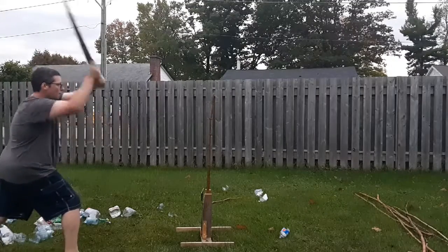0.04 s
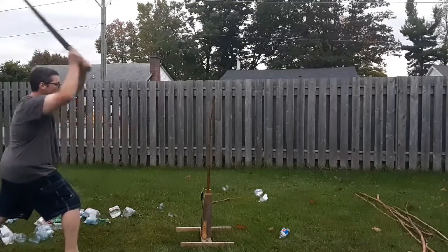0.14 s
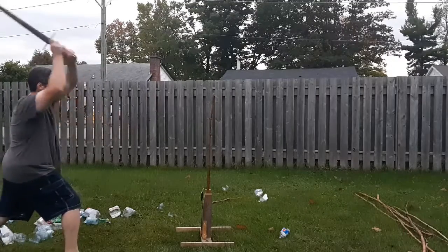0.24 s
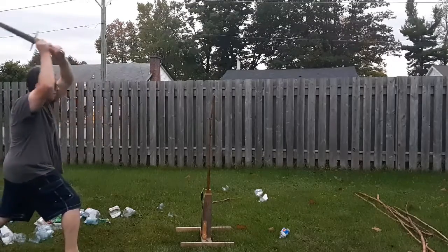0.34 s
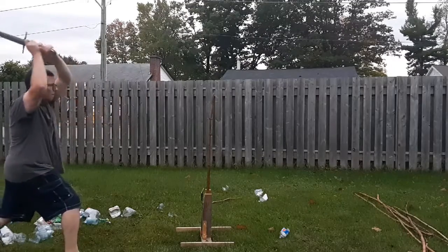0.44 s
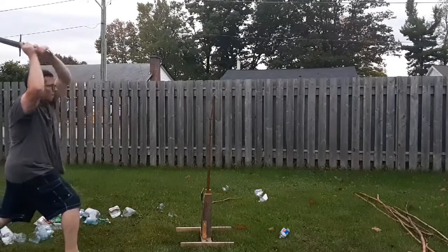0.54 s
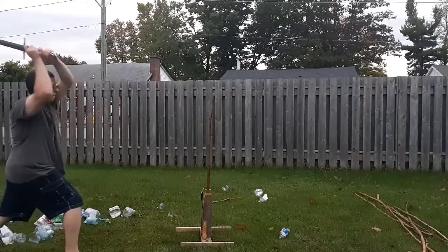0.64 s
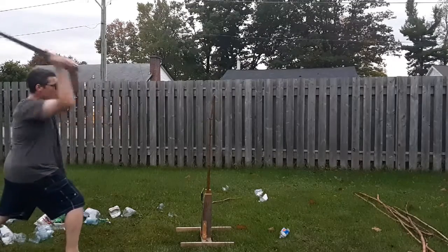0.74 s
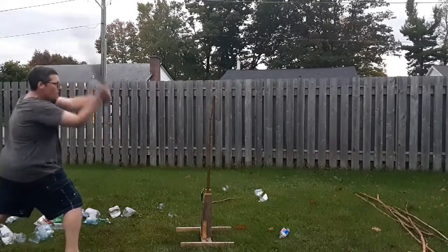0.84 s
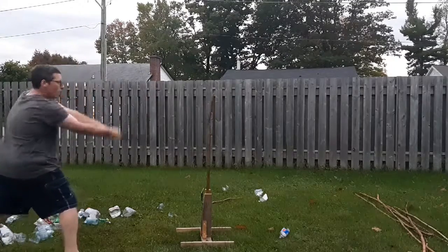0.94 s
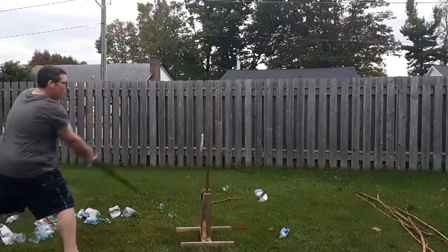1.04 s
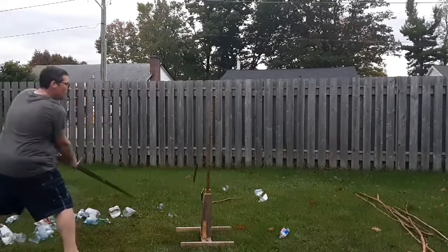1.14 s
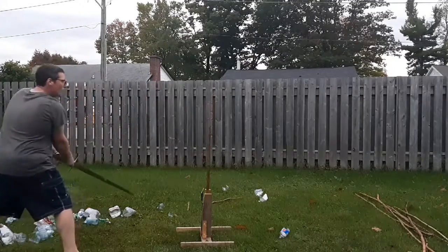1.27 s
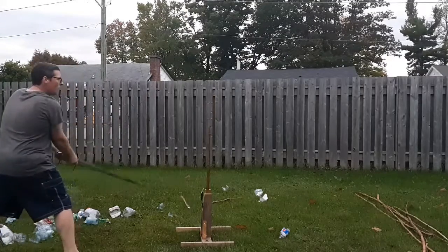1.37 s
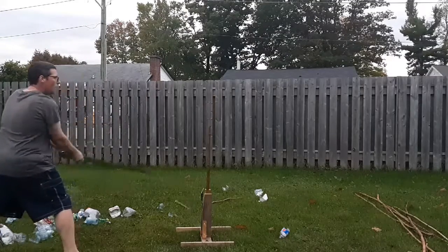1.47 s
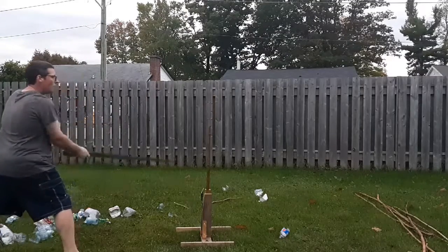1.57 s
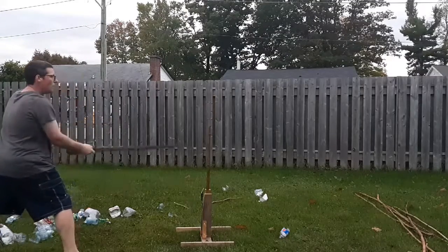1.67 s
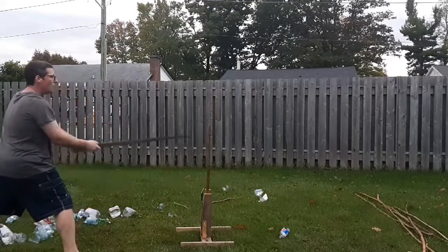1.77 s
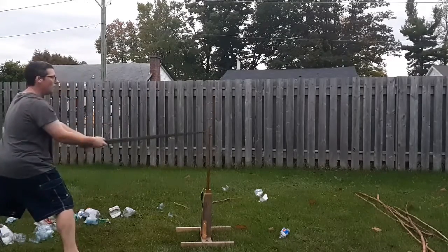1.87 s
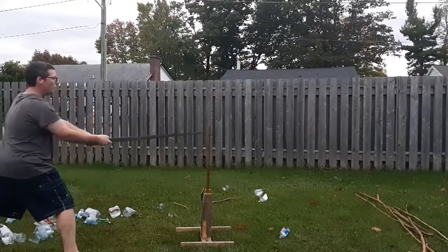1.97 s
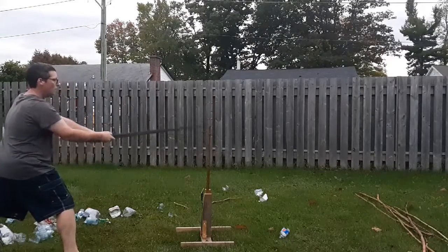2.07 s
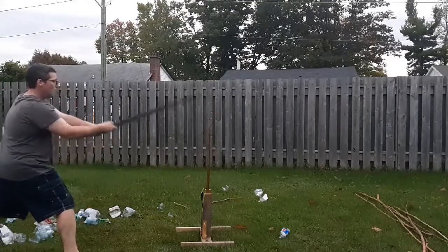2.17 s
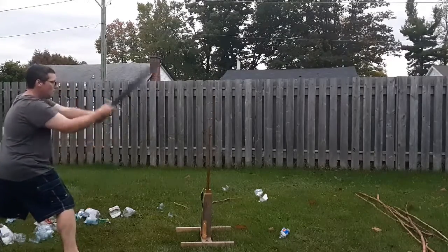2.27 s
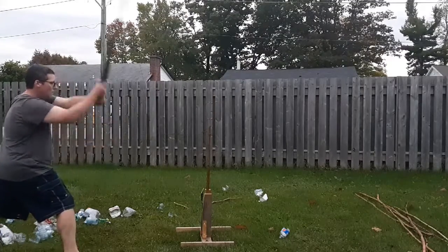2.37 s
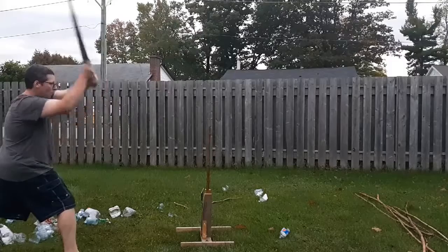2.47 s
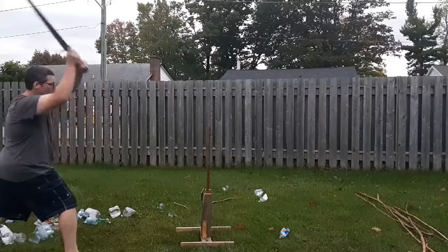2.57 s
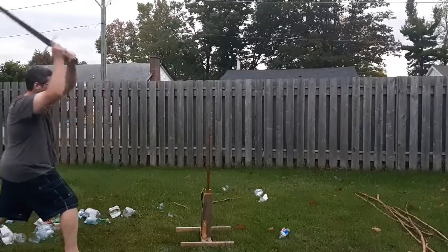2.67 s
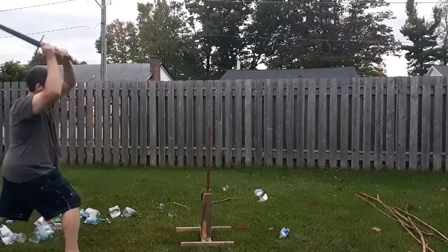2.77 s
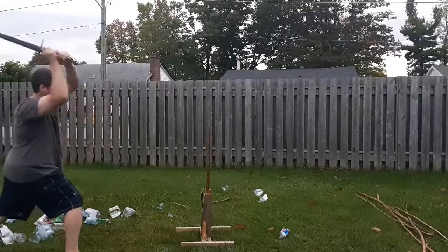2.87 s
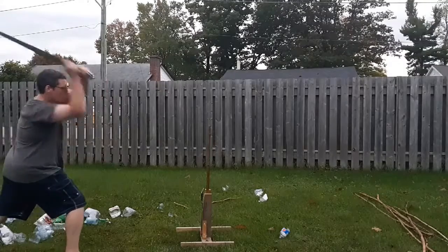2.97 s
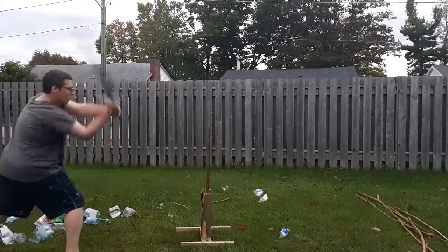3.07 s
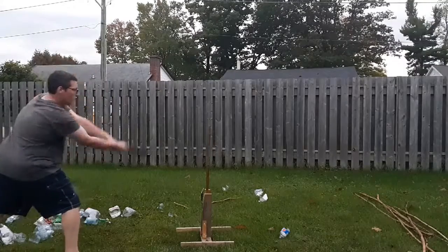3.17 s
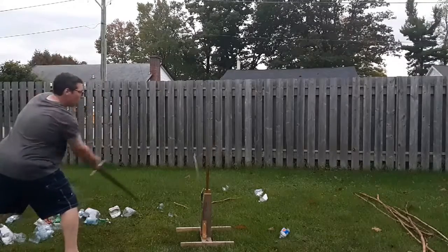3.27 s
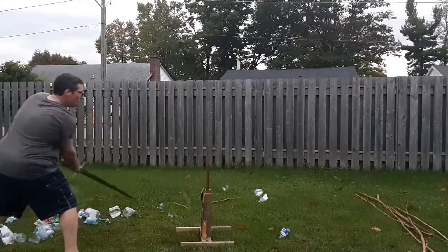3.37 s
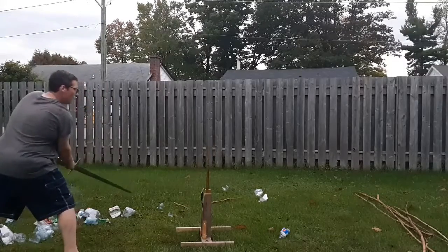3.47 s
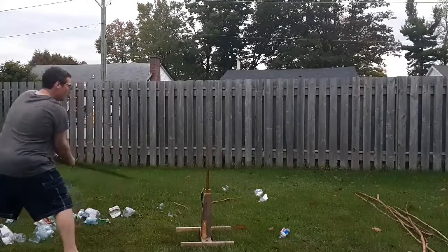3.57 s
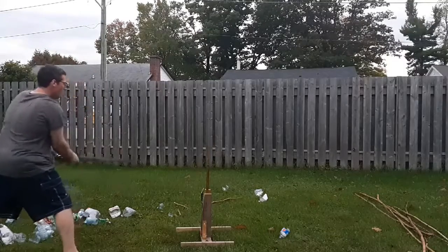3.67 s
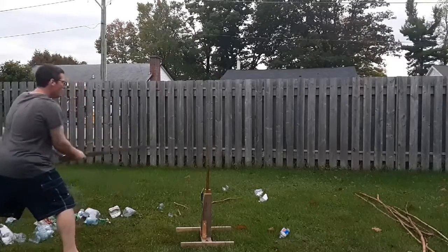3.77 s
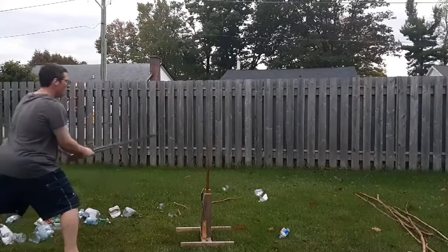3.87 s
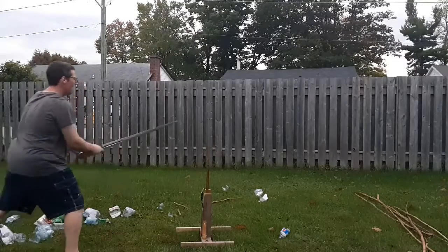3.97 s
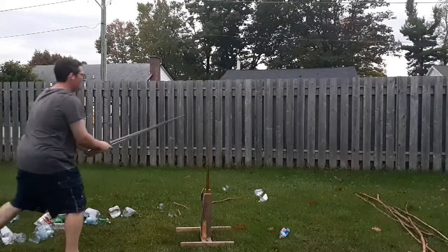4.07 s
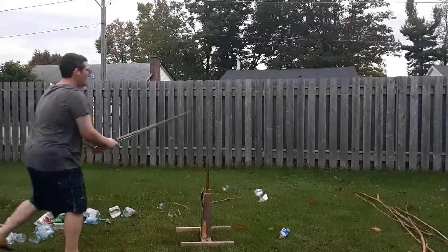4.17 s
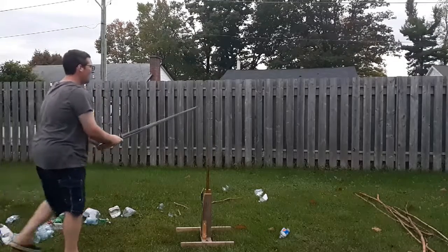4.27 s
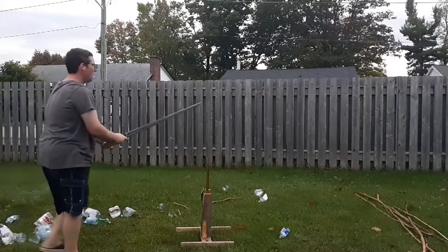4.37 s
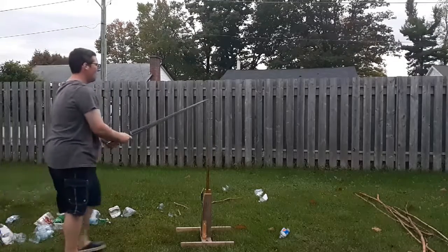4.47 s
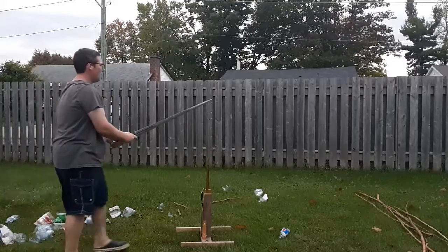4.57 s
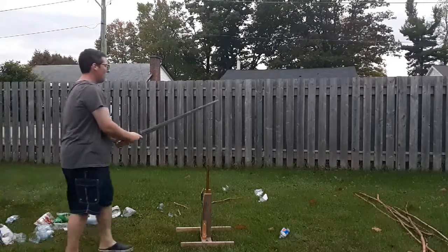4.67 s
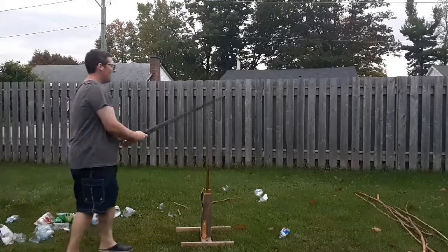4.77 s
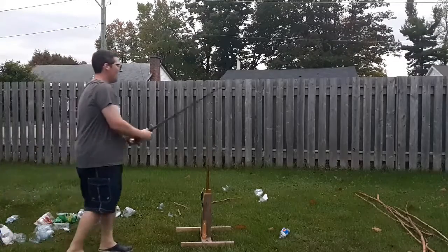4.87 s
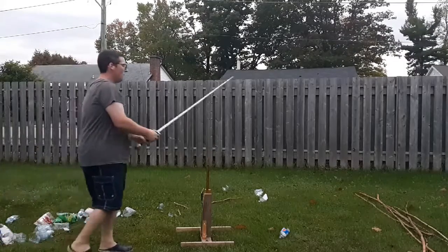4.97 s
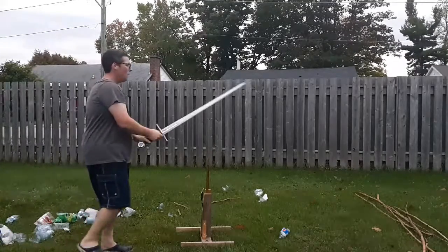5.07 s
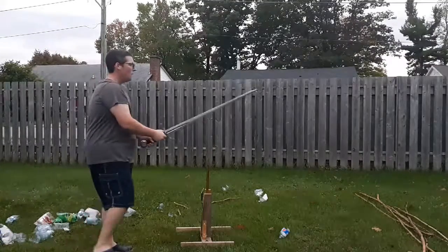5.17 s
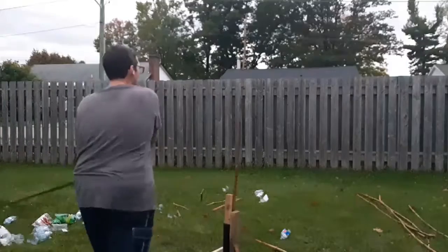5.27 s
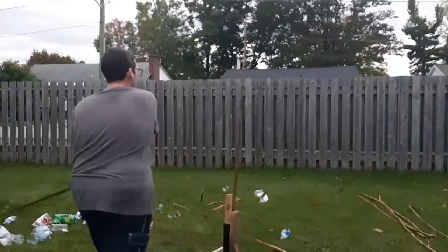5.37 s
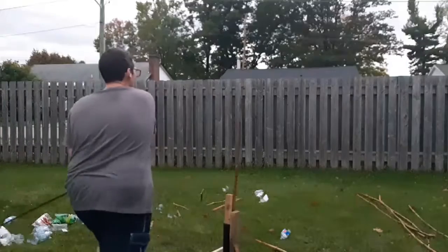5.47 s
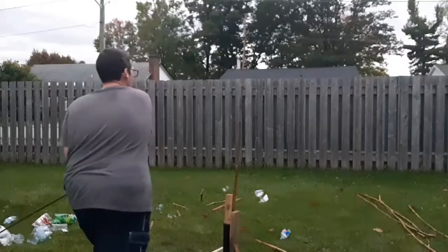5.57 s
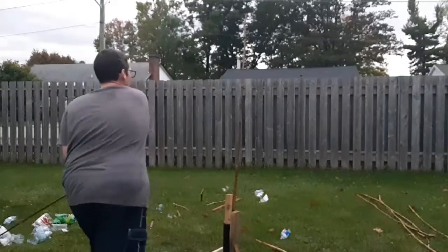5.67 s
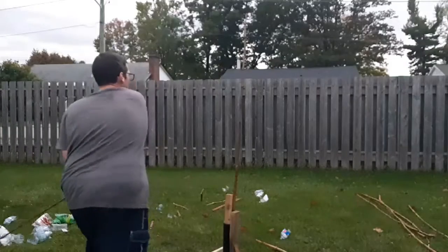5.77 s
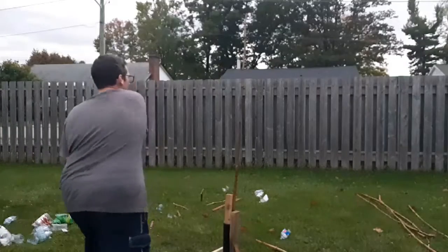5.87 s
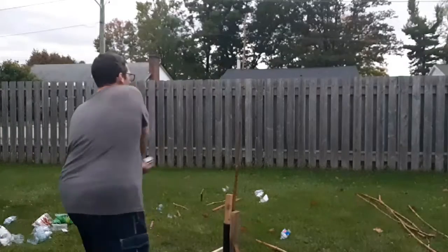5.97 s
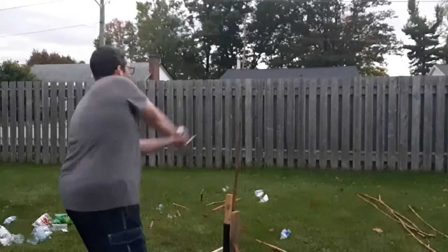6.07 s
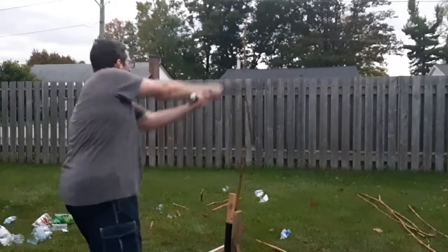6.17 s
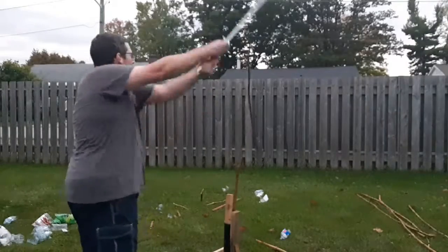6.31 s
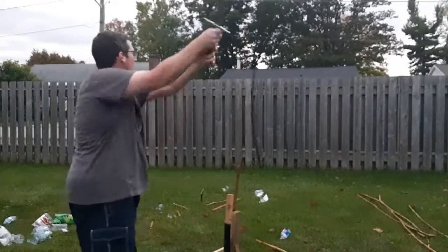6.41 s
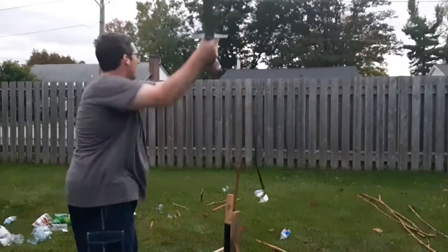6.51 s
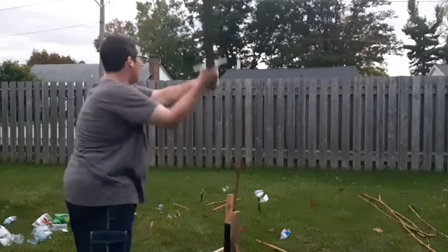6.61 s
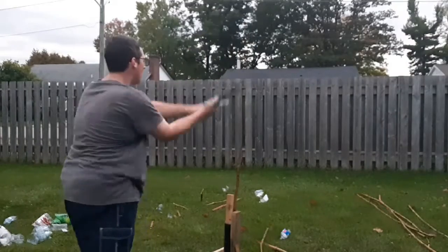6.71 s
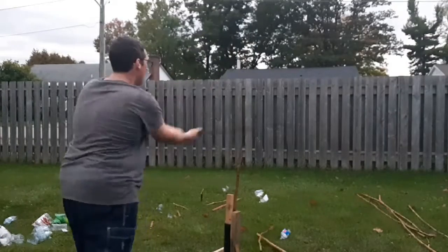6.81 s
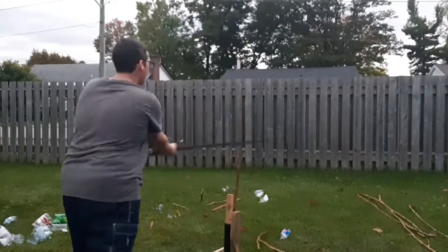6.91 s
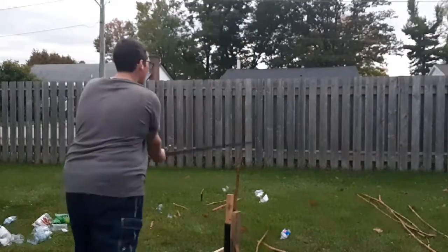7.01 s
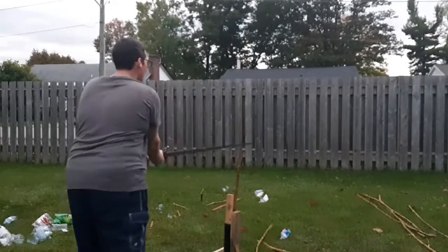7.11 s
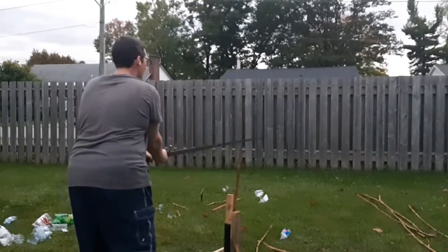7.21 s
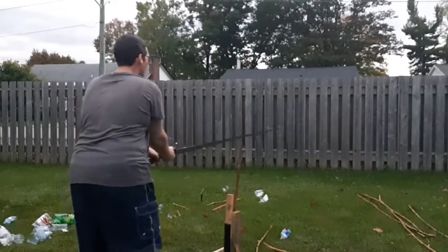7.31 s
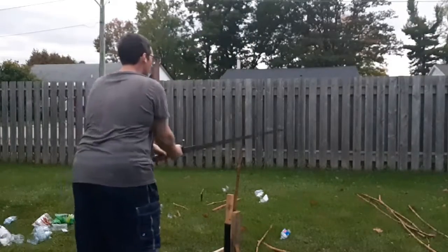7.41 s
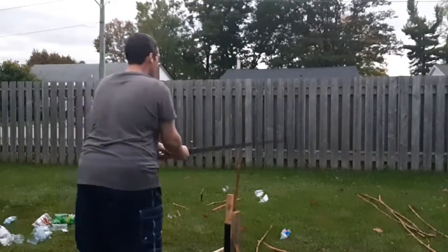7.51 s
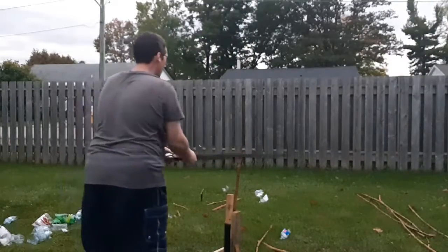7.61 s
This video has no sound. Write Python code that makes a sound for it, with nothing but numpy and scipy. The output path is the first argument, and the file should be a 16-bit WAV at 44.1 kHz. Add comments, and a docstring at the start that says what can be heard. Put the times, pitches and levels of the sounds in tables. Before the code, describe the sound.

Outdoors, a sword cracks through hollow bamboo three times, each snap echoing off fence and house, followed by light woody clicks over soft suburban rumble.

```python
"""In a fenced back yard in a suburb, a sword cuts an upright bamboo stalk three times.
Each cut is a burst of snapping fibres and a ringing tube, answered by fence, house and yard.
Blade swishes are narrow moving noise; knocks are short rattles that ring bamboo; grass rustles in crisp swells.
Behind them are a faint falling whistle, a far engine made of two low tones, and the filtered noise of the suburb.
The recorder turns itself down for about a second after each cut."""
import sys
import numpy as np
from scipy import signal
from scipy.fft import rfft, irfft
from scipy.io import wavfile
from scipy.ndimage import uniform_filter1d, minimum_filter1d

SR = 44100
rng = np.random.default_rng(int(sys.argv[2]) if len(sys.argv) > 2 else 0)


def dump(signal):
    """Clip the signal to [-1, 1] and save it as 16-bit WAV at the path in sys.argv[1]."""
    limited = np.clip(np.atleast_2d(signal).T, -1, 1)
    pcm = np.round(limited * 32767).astype(np.int16)
    wavfile.write(sys.argv[1], SR, pcm)


N = 337365
TIME = np.arange(N) / SR


def undb(db):
    """Turn decibels into a gain."""
    return 10 ** (np.asarray(db) / 20)


def unit(x):
    """Scale a sound to an average strength (rms) of 1."""
    return x / np.sqrt(np.mean(x ** 2))


def curves(rows):
    """Join each column of a timed table by straight lines."""
    s, *columns = np.transpose(rows)
    return [np.interp(TIME, s, column) for column in columns]


def add(out, s, x):
    """Mix x into out from time s."""
    start = int(s * SR)
    out[start:start + len(x)] += x[:N - start]


def colour(x, points, size=4096):
    """Filter through (f/Hz, level/dB) points without looking ahead, keeping the power of white noise."""
    hz, db = np.transpose(points)
    bin_hz = np.arange(size // 2 + 1) * SR / size
    gain = undb(np.interp(np.log(bin_hz + 1), np.log(hz), db))
    # folding the cepstrum makes the filter respond as early as it can
    cepstrum = irfft(np.log(gain))
    cepstrum[1:size // 2] *= 2
    cepstrum[size // 2 + 1:] = 0
    response = irfft(np.exp(rfft(cepstrum)))
    return signal.fftconvolve(x, response / np.linalg.norm(response))[:len(x)]


def walk(rate):
    """Smooth random drift of rms 1, heading for a new value `rate` times a second."""
    k = int(SR / rate)
    steps = np.repeat(rng.standard_normal(N // k + 1), k)
    smooth = uniform_filter1d(uniform_filter1d(steps, k), k)
    return unit(smooth[:N])


def swell(s, width_s):
    """A smooth bell-shaped rise and fall that reaches 1 at time s."""
    return np.exp(-.5 * ((TIME - s) / width_s) ** 2)


def rush(hz, half_width_hz):
    """Narrow noise around a moving pitch: two slow random signals ride on a cosine and a sine."""
    lowpass = signal.butter(2, half_width_hz, fs=SR, output="sos")
    eddies = signal.sosfilt(lowpass, rng.standard_normal((2, N)))
    phase = 2 * np.pi * np.cumsum(hz) / SR
    return unit(eddies[0] * np.cos(phase) + eddies[1] * np.sin(phase))


def ring(modes, t, ratio=1):
    """Hollow bamboo vibrates at several pitches at once, each dying away from t = 0."""
    t = np.maximum(t, 0)
    total = 0
    for hz, db, t60 in modes:
        decay = np.exp(-np.log(1000) * t / t60)
        total = total + undb(db) * np.sin(2 * np.pi * hz * ratio * t) * decay
    return total


def fibres(t, length, fade_s, scatter_db):
    """Dense snaps of uneven size while the contact lasts, dying out after it."""
    size_db = scatter_db * np.clip(rng.standard_normal(len(t)), -2, 2)
    snaps = rng.choice([-1, 1], len(t)) * undb(size_db)
    return unit(snaps) * np.exp(-np.maximum(t - length, 0) / fade_s)


def cuts(tick_db=-8.5, tube_db=-4.0):
    """The blade crushes through the fibres, a few snap loudly, the tube rings and the yard answers."""
    # one row per cut: t/s, crushing level/dB, time in the stalk/s, pulse into the yard/dB,
    # fence echo delay/s, fence echo/dB, house echo/dB
    cut_rows = [(1.0722, -18, 0.0058, 3.5, 0.026, -8.5, -16), (3.3125, -18, 0.005, 4, 0.025, -6, -18.5),
                (6.2808, -15.5, 0.00626, 4.5, .028, -9.5, -26)]
    # colour of the splitting fibres, one list per cut: f/Hz, level/dB
    split_colours = [
        [(100, -34), (250, -5), (400, -4.5), (720, -2), (1000, 3), (1300, 2), (1750, 8.5), (2500, -10),
         (3800, -0.5), (4800, -6), (6200, 1), (7800, -9.5), (10500, -17.5), (14500, -14.5)],
        [(100, -12), (200, -4.5), (450, -5.5), (720, -1.5), (970, 0), (1350, 7), (2200, 8.5), (2850, -8),
         (3400, 7.5), (4300, -4), (6000, 1), (8500, -7), (11000, -16), (15000, -12)],
        [(100, -29), (400, -13), (650, 0.5), (880, -13), (1080, 5.5), (1750, 1.5), (2700, -0.5), (3500, -1.5),
         (4500, 10.5), (5300, -3.5), (6400, -1.5), (8200, -14.5), (15000, -22)],
    ]
    # ring of the tube, one list per cut as it gets shorter: f/Hz, level before tube_db/dB, t60/s
    tube_modes = [
        [(1022, -16, 0.091), (1195, -28, 0.18), (1525, -21, .055), (1737, -19.5, 0.029), (3170, -22.5, .022),
         (6160, -19.5, 0.025)],
        [(832, -20, 0.089), (1390, -28, 0.058), (2150, -30.5, 0.02), (2280, -19, 0.04), (3340, -24, 0.022),
         (4620, -18, 0.04)],
        [(1020, -31, 0.037), (1200, -29, 0.12), (1698, -15, .04), (2120, -22, 0.047), (4330, -29, .07),
         (4600, -30, .035)],
    ]
    # colour of each cut as it spreads to all sides, one list per cut: f/Hz, level/dB
    spread_colours = [
        [(210, -48.5), (350, -18), (481, -16), (774, -18), (981, 1.5), (1080, -6), (1480, -4.5), (1660, -8),
         (1790, -3), (2310, -12.5), (4570, -9), (6690, -12.5), (8620, -20.5), (15500, -18.5)],
        [(210, -36), (350, -22.5), (563, -21), (610, -11), (761, -24), (837, -17), (1210, -11), (1710, -3.5),
         (1970, -9), (2390, -2), (2890, -20.5), (3330, -8.5), (4570, -10), (7710, -19), (15500, -23)],
        [(470, -29), (800, -1), (1000, 2), (1350, -8), (1490, -8), (1680, -4), (1950, -11), (3460, -17),
         (3960, -10.5), (5080, -16.5), (6270, -11), (7930, -24), (15500, -25)],
    ]
    # extra loud fibre snaps: t/s, level against the crushing/dB
    loud_snaps = [(1.0742, 1), (1.0777, 1.5), (3.3171, 5), (3.318, 0), (6.2836, 3), (6.2879, -3)]
    # the bounce off the ground and the echo from the house arrive this long after the fence echo
    ground_lag_s, house_lag_s = .0115, .072
    ground_db = -7  # against the fence echo
    # the echoes are fuller in the lows and around 1700 Hz: f/Hz, level/dB
    echo_colour = [(200, 8.5), (900, -2.5), (1700, 5.0), (3000, -4.5), (5000, -6.5), (15000, 4.0)]

    near, far, t = np.zeros(N), np.zeros(N), TIME[:SR // 4]
    for row, split, tube, spread in zip(cut_rows, split_colours, tube_modes, spread_colours):
        s, db, length, yard_db, fence_s, fence_db, house_db = row
        snapping = 0
        for snap_s, snap_db in loud_snaps:
            snapping = snapping + undb(snap_db) * np.exp(-((s + t - snap_s) / 0.00044) ** 2)
        crushing = fibres(t, length, fade_s=0.0073, scatter_db=2)
        crack = colour(crushing * (1 + snapping), split)
        # clean breaks reach higher than the crushing
        ticks = undb(tick_db) * snapping * rng.standard_normal(len(t))
        cut = undb(db) * (crack + ticks) + undb(tube_db) * ring(tube, t - .4 * length)
        add(near, s, cut)

        echo = colour(cut, echo_colour)
        for lag_s, echo_db in [(0, fence_db), (ground_lag_s, fence_db + ground_db), (house_lag_s, house_db)]:
            add(near, s + fence_s + lag_s, undb(echo_db) * echo)

        # to the far yard the cut is one sharp pulse
        pulse = 1. * (t == 0)
        add(far, s, undb(yard_db) * colour(pulse, spread))
    return near + yard(far)


def yard(x, build_s=0.015, gap_s=0.013, patchy_db=1.8):
    """Boards, walls and trees scatter the sound in uneven clumps; the lawn swallows the low middle first."""
    # how fast the yard falls silent: f/Hz, t60/s
    yard_decay = [(150, 0.7), (500, 0.88), (950, 0.16), (1700, 0.85), (2600, 0.81), (4200, 0.77),
                  (6500, 0.67), (10000, 0.54), (15000, 0.44)]
    t = TIME[:SR]
    hz, t60 = np.transpose(yard_decay)
    noise = rfft(rng.standard_normal(SR))
    log_hz = np.log(np.arange(SR // 2 + 1) + 1)
    tail = 0
    # split the noise into overlapping bands and let each fade at its own pace
    for k, share in enumerate(np.eye(len(hz))):
        band = irfft(noise * np.interp(log_hz, np.log(hz), share), SR)
        tail = tail + band * np.exp(-np.log(1000) * t / t60[k])
    build = np.clip((t - gap_s) / build_s, 0, 1)
    tail = tail * build * undb(patchy_db * walk(400)[:SR])
    return signal.fftconvolve(x, tail / np.linalg.norm(tail))[:N]


def knocks(yard_db=-16):
    """A glancing blade or a loose piece rattles briefly against bamboo and makes it ring."""
    # t/s, ring level/dB, contact time/s, pitch ratio, clack level before its band filter/dB,
    # clack from f/Hz, clack up to f/Hz
    knock_rows = [(6.8588, -22.5, 0.00039, 1.02, -20, 1500, 11000),
                  (6.8715, -19, 0.0057, 1.04, -23.5, 350, 12000),
                  (6.889, -31, 0.0156, 0.83, -38, 500, 5000), (7.2085, -31, 0.0021, 1.1, -28.5, 550, 3800),
                  (7.2127, -21.5, 0.00336, .93, -29, 500, 2200), (7.3, -36, 0.0029, 0.95, -46, 600, 2200)]
    # ring of knocked bamboo, before pitch ratio and ring level: f/Hz, level/dB, t60/s
    piece_modes = [(608, -19.5, 0.34), (820, -17.5, 0.1), (1083, -20, 0.057), (1667, 0, 0.024),
                   (1886, -12, 0.075), (2200, -7.5, 0.029)]
    # colour of the clack: f/Hz, level/dB
    clack_colour = [(250, -14), (700, 7.5), (1500, 6.5), (2300, 1), (3500, -2.5), (6200, -3), (7800, -15),
                    (15500, -4)]
    out, t = np.zeros(N), TIME[:SR // 4]
    for s, ring_db, length, ratio, clack_db, low_hz, top_hz in knock_rows:
        clack = colour(fibres(t, length, fade_s=0.0039, scatter_db=7.5), clack_colour)
        band = signal.butter(2, [low_hz, min(top_hz, SR / 3)], "band", fs=SR, output="sos")
        clack = signal.sosfilt(band, clack)
        ringing = ring(piece_modes, t - length / 4, ratio)
        add(out, s, undb(clack_db) * clack + undb(ring_db) * ringing)
    return out + undb(yard_db) * yard(out)


def swishes(half_width_hz=330, sag=0.14):
    """Eddies shed by the blade make a narrow rush whose level and pitch follow its speed; the edge hisses."""
    # fastest moment t/s, level/dB, width in time/s, top pitch f/Hz, edge hiss against the rush/dB
    swish_rows = [(1.064, -45, .035, 1690, -13.5), (3.325, -46, 0.018, 2055, -9.5),
                  (6.76, -53.5, .085, 3150, 3.5)]
    # colour of the edge hiss: f/Hz, level/dB
    edge_colour = [(400, -18), (1000, -1), (2500, 2.5), (4300, 1.5), (5500, -9.0), (6500, 1), (7800, -16),
                   (10000, -17.5), (12000, -32.0)]
    out = np.zeros(N)
    for s, db, width_s, top_hz, edge_db in swish_rows:
        speed = swell(s, width_s)
        edge = colour(rng.standard_normal(N), edge_colour)
        # a slow blade loses up to the share `sag` of its top pitch
        pitch_hz = top_hz * (1 - sag * (1 - speed))
        out += undb(db) * speed * (rush(pitch_hz, half_width_hz) + undb(edge_db) * edge)
    return out


def grass():
    """Pieces and feet make grass blades flick past each other in short crisp swells."""
    # t/s, level/dB, width in time/s
    brushes = [(1.408, -53, .013), (3.55, -52, 0.0055), (3.598, -57, .007), (4.714, -65, 0.054),
               (4.958, -58, 0.013), (5.174, -63, 0.038), (5.42, -75, .06), (5.87, -62, 0.016),
               (6.596, -58, .002), (6.842, -52, 0.013), (6.93, -47, 0.015), (7.545, -57, 0.023)]
    # colour of the rustle: f/Hz, level/dB
    grass_colour = [(1500, -20), (3500, 8), (6500, 6), (8000, 0), (10000, 2), (12500, -7), (15500, 5)]
    brushing = sum(undb(db) * swell(s, width_s) for s, db, width_s in brushes)
    # noise of very uneven size sounds crisp
    flicks = unit(rng.standard_normal(N) * undb(6.2 * rng.standard_normal(N)))
    return colour(brushing * flicks, grass_colour)


def whistle():
    """A thin, airy whistle of narrow noise swells and fades while its pitch falls."""
    loudest_s, width_s, level_db = 0.25, .12, -68
    pitch_hz, fall_hz_per_s = 3430, 1500  # pitch at the loudest moment
    hz = pitch_hz - fall_hz_per_s * (TIME - loudest_s)
    return undb(level_db) * swell(loudest_s, width_s) * rush(hz, half_width_hz=150)


def engine(firing_waver_db=3.0, octave_waver_db=2.0, drift_hz=0.453):
    """Only the two lowest exhaust tones of a far engine carry this far, wavering on the way."""
    # the two tones swell unevenly, then cut off abruptly: t/s, firing tone before wavering/dB, its octave
    # before wavering/dB
    engine_levels = [(0, -58, -56), (.9, -61, -62.5), (2.1, -62, -59.5), (2.45, -52, -55), (2.86, -51, -42.5),
                     (3.22, -49, -53.5), (3.5, -54.5, -46.5), (4.3, -58, -47.5), (5, -51.5, -59.5),
                     (5.33, -46, -49)]
    start_hz, rise_hz_per_s = 72.3, .5  # firing rate before drift; it creeps up
    low_db, high_db = curves(engine_levels)
    firing_hz = start_hz + rise_hz_per_s * TIME + drift_hz * walk(8.1)
    phase = 2 * np.pi * np.cumsum(firing_hz) / SR
    firing = undb(low_db + firing_waver_db * walk(13)) * np.sin(phase)
    octave = undb(high_db + octave_waver_db * walk(13)) * np.sin(2 * phase)
    # a quick fade-out follows the last row of the table
    sounding = np.clip((engine_levels[-1][0] - TIME) / 0.0088 + 1, 0, 1)
    return np.sqrt(2) * (firing + octave) * sounding


def suburb(rumble_db=-0.58):
    """Rumble and tyre noise follow the far traffic, leaves hiss; each flutters a little on its own."""
    # levels before the flutter: t/s, traffic/dB, leaf hiss/dB
    air_levels = [(0, -54, -64), (2.3, -53, -66.5), (2.9, -50, -63), (4.2, -49.5, -61), (5.1, -47, -55.5),
                  (5.6, -49, -56.5), (6.5, -46.5, -56), (7.65, -46.5, -56.5)]
    # colour of the low rumble: f/Hz, level/dB
    rumble_colour = [(25, -41.5), (45, -1.5), (65, 0), (110, 7), (170, 7.5), (260, 3.5), (400, -6),
                     (700, -41.5)]
    # colour of the tyre noise: f/Hz, level/dB
    traffic_colour = [(250, -4), (450, -3), (600, 5.5), (760, 0), (1100, -3), (2000, -8), (2600, -21.5),
                      (5000, -59.5)]
    # colour of the leaf hiss: f/Hz, level/dB
    leaf_colour = [(1500, 1.5), (2800, 2.5), (4300, 1), (5400, -2.5), (6700, -0.5), (7600, -15),
                   (10000, -20), (12000, -45.5), (15500, -34)]
    traffic_db, leaves_db = curves(air_levels)
    layers = [(rumble_colour, traffic_db + rumble_db + 0.81 * walk(12)),
              (traffic_colour, traffic_db + .5 * walk(9)),
              (leaf_colour, leaves_db + 0.18 * walk(7))]
    return sum(undb(db) * colour(rng.standard_normal(N), points) for points, db in layers)


def scene():
    """Add up everything in the yard, on one channel."""
    return (cuts() + knocks() + swishes() + whistle() + grass() + engine() + suburb())[None]


def gain_control(x):
    """A sound over the threshold turns the gain down; it is held there, then glides back."""
    threshold_db, most_duck_db = -26, 4
    detect_s, hold_s, glide_s = .01, 1.04, 0.35
    detect, hold, glide = (int(s * SR) for s in (detect_s, hold_s, glide_s))
    power = np.abs(uniform_filter1d(x ** 2, detect))
    level_db = 10 * np.log10(power + 1e-12)
    wanted_db = -np.clip(level_db - threshold_db, 0, most_duck_db)
    # the origins make both windows look back in time
    held_db = minimum_filter1d(wanted_db, hold, origin=(hold - 1) // 2, mode="constant")
    gain_db = uniform_filter1d(held_db, glide, origin=(glide - 1) // 2, mode="constant")
    return x * undb(gain_db)


def record(dry):
    """A small microphone adds hiss and loses deep bass; the gain ducks, the level dips once, the top is cut."""
    # the level dips briefly: t/s, gain
    level_dip = [(5.3425, 1), (5.3435, .03), (5.348, .12), (5.362, 1)]
    hiss_db, low_hz, top_hz = -81, 51.1, 15850  # hiss before the filters and gain control; bass and treble cuts
    hiss = undb(hiss_db) * rng.standard_normal(N)
    bass_cut = signal.butter(3, low_hz, "high", fs=SR, output="sos")
    thin = signal.sosfilt(bass_cut, dry + hiss)
    levelled = gain_control(thin) * curves(level_dip)[0]
    top_cut = signal.ellip(10, .2, 80, top_hz, fs=SR, output="sos")
    return signal.sosfilt(top_cut, levelled)


dry = scene()
out = record(dry)
dump(out)
```